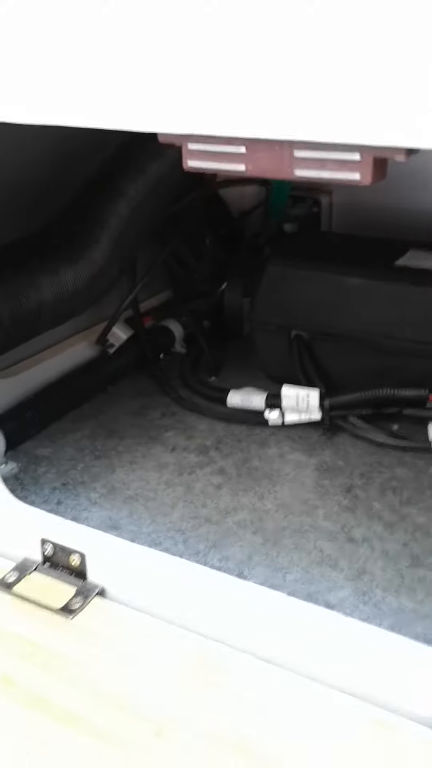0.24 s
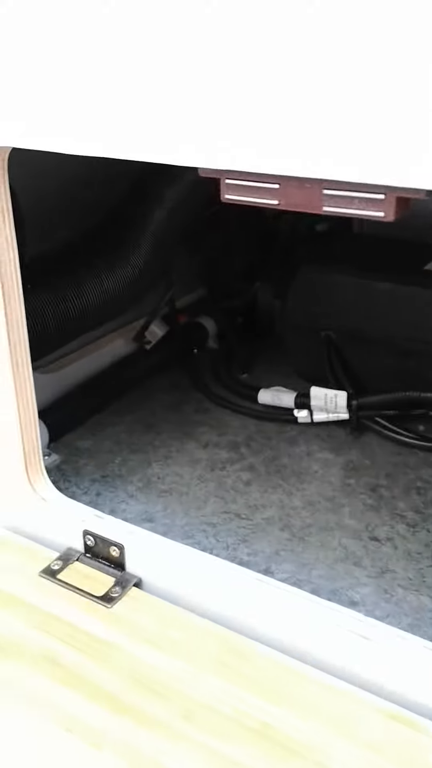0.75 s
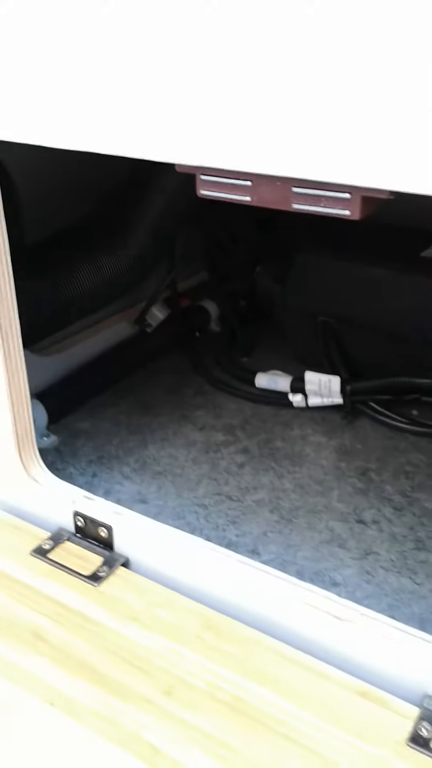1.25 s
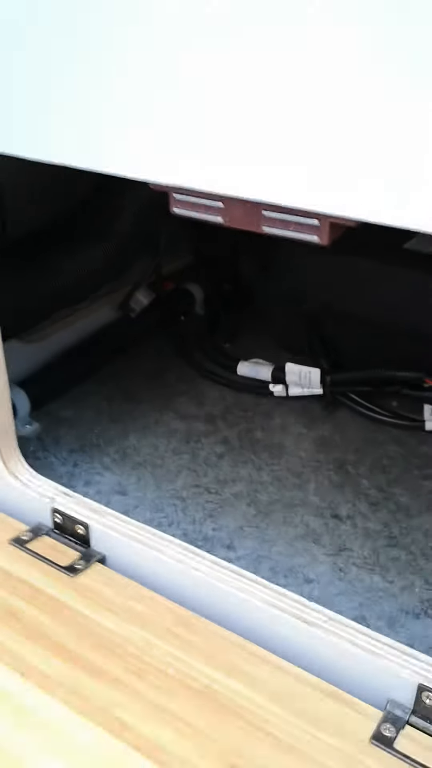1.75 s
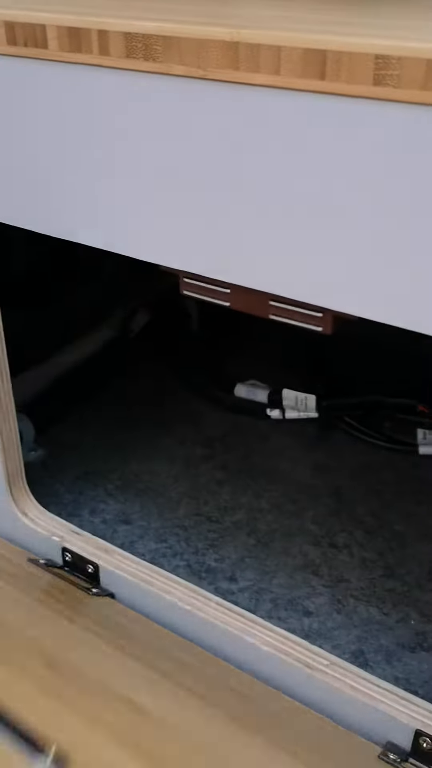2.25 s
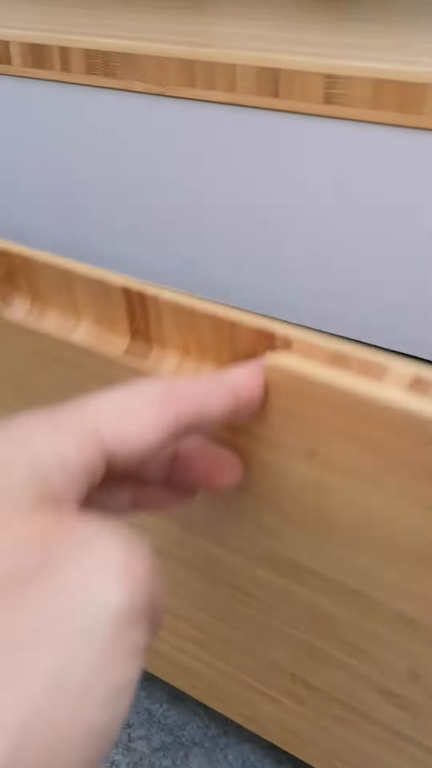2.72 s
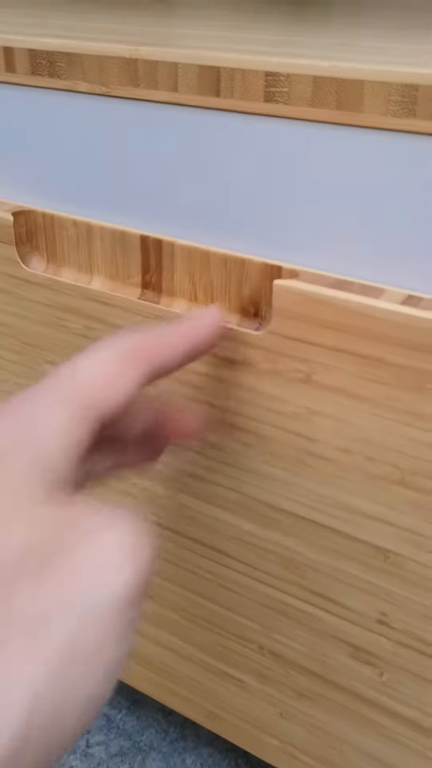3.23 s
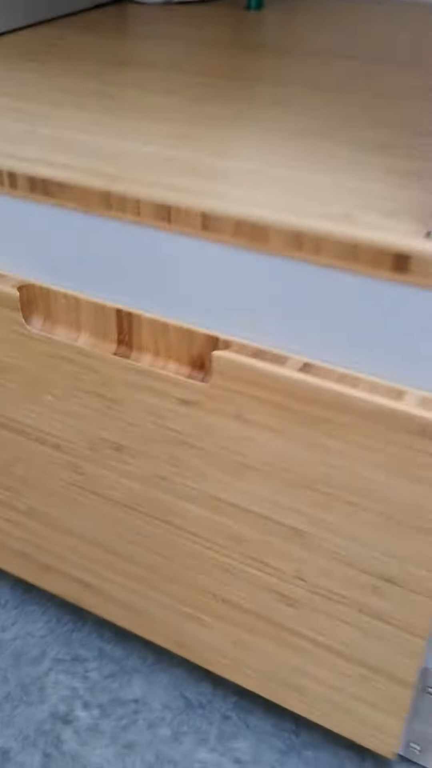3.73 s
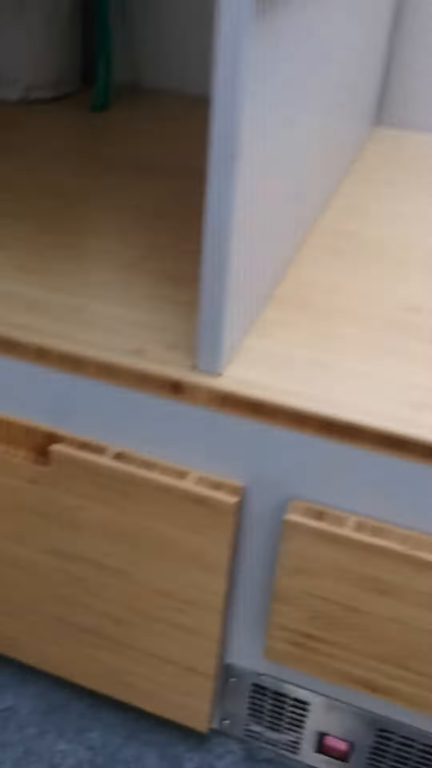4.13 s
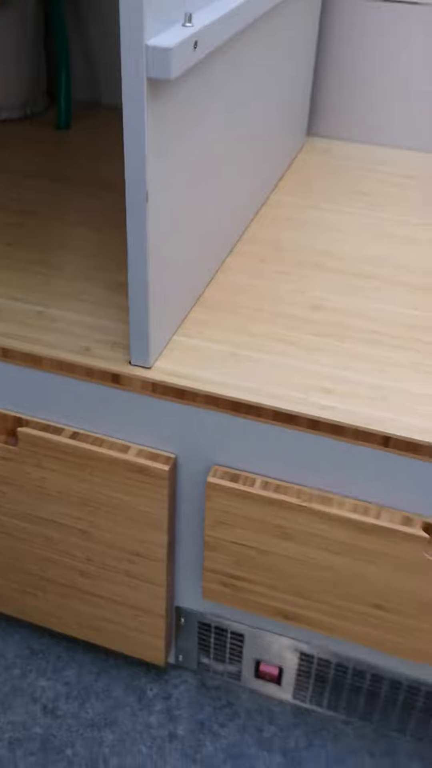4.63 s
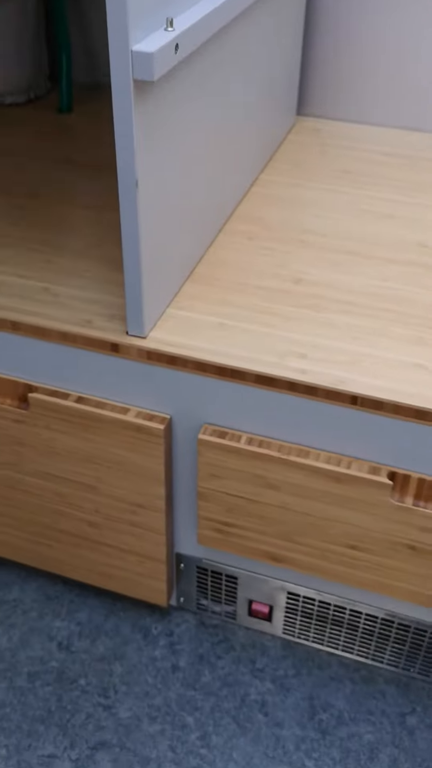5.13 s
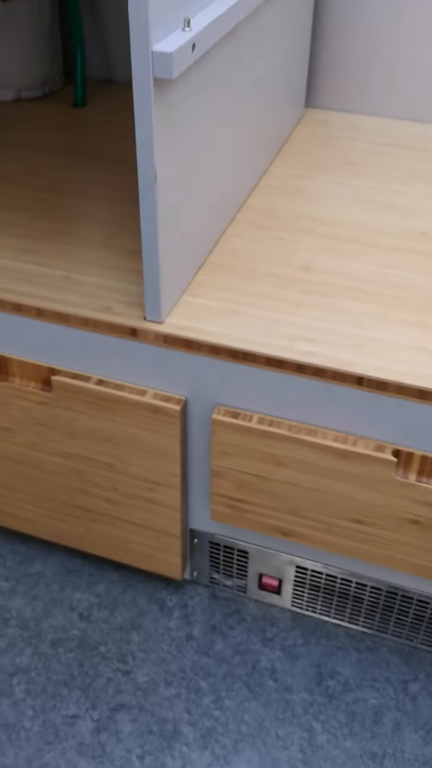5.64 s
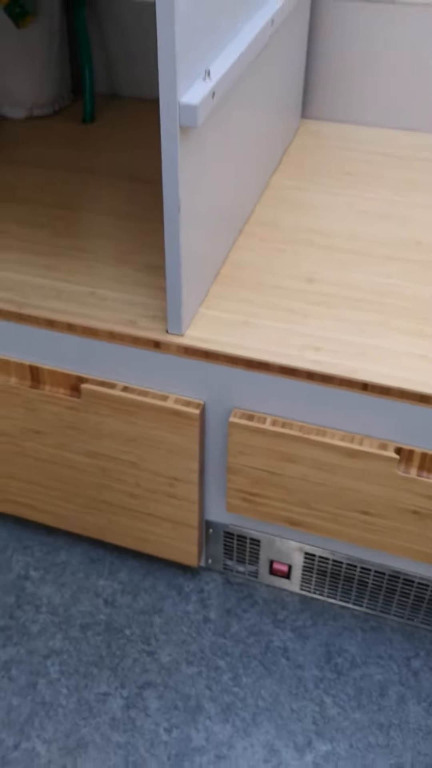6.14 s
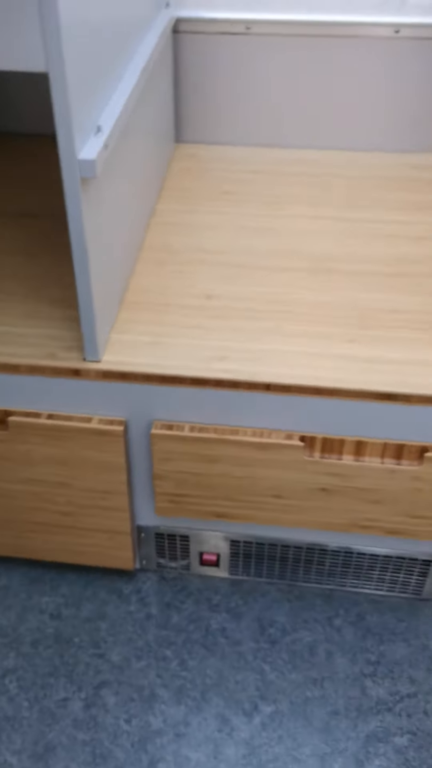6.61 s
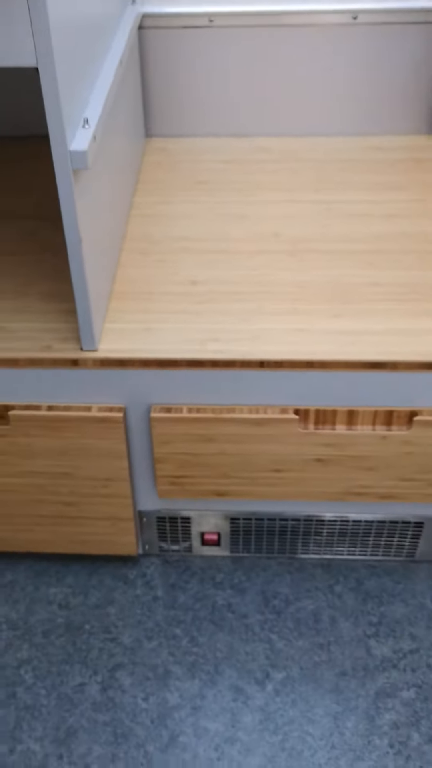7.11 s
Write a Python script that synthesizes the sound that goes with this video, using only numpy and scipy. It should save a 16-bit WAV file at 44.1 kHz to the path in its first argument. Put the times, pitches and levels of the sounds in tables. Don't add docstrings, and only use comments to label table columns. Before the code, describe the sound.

A hand-held camera's stereo microphones hear a small blower heater running throughout, lumpy low rumble under breathy duct noise and a steady hum. Fabric slides and small plastic creaks accompany an arm reaching. A thin hinge note precedes one loud, woody magnetic slam. Afterwards the heater is quieter and muffled, with brisk cloth scrapes and two heavy, dull knocks on a hollow floor in the dry, small interior.

```python
import sys
import numpy as np
from scipy import signal
from scipy.fft import rfft, irfft, next_fast_len
from scipy.io import wavfile
from scipy.ndimage import uniform_filter1d, map_coordinates

SR = 44100
rng = np.random.default_rng(int(sys.argv[2]) if len(sys.argv) > 2 else 0)


def rack_gain(trim_db):
    fader = np.asarray(trim_db, float)
    return 10 ** (fader / 20)


def transcribe(signal):
    frames = np.atleast_2d(signal).T
    limited = np.clip(frames, -1, 1)
    pcm = np.round(limited * 32767).astype(np.int16)
    wavfile.write(sys.argv[1], SR, pcm)


N = 325017

LEFT_LAG_S = 24 / 44100
TOP_HZ = 15350
SHUT_S = 3.1
SETTLED_S, SETTLE_T60_S = 3.265, 0.09
SHADE_S, SHADE_LENGTH_S, SHADE_DB = 2.65, 0.23, -7.5
SIDEBANDS_DB, SIDEBANDS_SHUT_DB = -5, -7
STROKE_DROP_DB, STROKE_SHAPE = 22.5, 1.27
FIDGET_DB, FIDGET_SCRAPE_DB = -81.5, 7
CRUNCH_T60_S = 0.031

# time_s, gain_db
NEARNESS = [(0.0, 0), (0.9, -2.5), (1.15, 2.5), (1.75, 2.5), (1.97, -0.5), (2.25, -3.5), (2.5, -1.5),
            (2.95, -3), (3.45, -3.5), (4.3, -7.5), (5.5, -9.5), (6.3, -9), (7.37, -7.5)]
# level_db, slope (dB per dB of nearness), change_when_shut_db
DEEP_LAW = (-52, 0.7, -1.2)
BOOM_LAW = (-47, 1.2, -3)
DUCT_LAW = (-56.5, 0.75, 0.32)
GRILLE_LAW = (-65, 1, 1)
BLADE_LAW = (-53, .6, -6)
WHINE_LAW = (-74.5, 1.2, -2.5)
# pitch_hz, likeness (1 same, -1 opposite)
HEATER_LIKENESS = [(60, 0.99), (130, 1), (290, 0.68), (640, -0.18), (1410, 0.49), (3100, -0.33),
                   (6820, 0.0), (15000, -0.11)]

# pitch_hz, level_db (per Hz)
DEEP_SPECTRUM = [(12, -46), (24, -17.5), (38, -2), (65, -0.5), (130, -10), (170, -29.5), (290, -120)]
BOOM_SPECTRUM = [(47, -33), (80, 0.5), (148, 1.5), (205, -7.5), (242, -18), (290, -15.5), (320, -20.5),
                 (420, -42.5), (700, -120)]
# middle_s, length_s, deep_db, boom_db
GRIP_JOLTS = [(0.159, 0.037, -63, -38.5), (0.322, 0.017, -52, -37.5), (0.633, 0.31, -64, -42.5),
              (1.118, 0.11, -33.5, -37), (1.226, .08, -45, -33), (1.324, 0.1, -41, -42),
              (1.424, 0.075, -36, -35.5), (1.585, 0.093, -37, -31.5), (1.862, 0.15, -39, -42),
              (2.102, 0.039, -64, -47), (2.314, 0.096, -43, -44.5), (2.425, 0.086, -41.5, -46),
              (2.613, 0.057, -44, -42), (2.878, 0.084, -49, -47), (3.234, 0.078, -47, -44),
              (3.544, 0.09, -48.5, -47.5), (3.807, 0.046, -49, -63), (4.06, 0.16, -46, -59),
              (4.668, 0.045, -49, -61.5), (4.948, 0.099, -48.5, -56), (5.3, .1, -52.5, -60),
              (5.55, 0.21, -54.5, -60.5), (5.901, 0.22, -56, -60), (6.45, 0.1, -47, -60),
              (6.653, 0.042, -51, -51.5), (6.85, .07, -50, -62), (7.202, 0.079, -48, -50)]

# pitch_hz, level_db (per Hz)
DUCT_OPEN_SPECTRUM = [(120, -39), (200, -7), (258, -7), (323, -5.5), (349, -19), (376, -10), (493, -10.5),
                      (651, -17), (817, -14), (889, -25.5), (951, -21.5), (1210, -26), (1500, -23.5),
                      (1950, -51), (3300, -120)]
DUCT_SHUT_SPECTRUM = [(120, -29.5), (200, 1.5), (332, -3.5), (383, -11), (427, -12), (758, -17.5),
                      (831, -13.5), (1060, -26.5), (1500, -25.5), (1950, -52), (3300, -120)]
GRILLE_SPECTRUM = [(650, -37.5), (1100, -2.5), (1200, -4), (1430, -10), (1590, 1), (1920, 5.5), (2310, -7),
                   (2700, 2.5), (3220, -28.5), (3630, -16.5), (4000, -26), (5200, -50.5), (8800, -120)]
# pitch_hz, level_db, width_hz
HUMS_OPEN = [(464, -71, 11), (574, -83, 6.1), (833, -75.5, 12), (953, -80, 10), (1410, -80.5, 22),
             (1885, -74.5, 12)]
HUMS_SHUT = [(423.6, -72, 11), (527, -85.5, 11), (582, -80, 10), (1850, -86, 20)]
# time_s, pitch_hz, standing_wave_db
BLADE_SPEED = [(0.0, 324, 0.5), (1.8, 326.8, -0.5), (3.0, 326.5, -0.5), (3.58, 327.3, 0),
               (3.68, 327.5, -6.5), (3.97, 328, -7), (4.05, 328, 4), (4.3, 328.5, -1), (4.95, 332.5, 3),
               (5.4, 335, 0), (6.3, 337.3, -1), (7.2, 337.5, -0.5), (7.37, 334.5, 1)]
# pitch_hz, level_db
SWITCHING_LINES = [(9512, -97.5), (9555, -83), (9674, -83), (9717, -87.5), (9841, -78), (10002, -85),
                   (10040, -87), (10164, -90.5), (10287, -89.5), (10331, -89.5), (10450, -94.5),
                   (10494, -93)]

# pitch_hz, level_db (per Hz)
FABRIC_SPECTRUM = [(1650, -28), (2800, -0.5), (3030, -9), (3450, -7.5), (3740, -5.5), (5800, -6),
                   (6330, -10), (7740, -6), (8380, -8), (10900, -14), (14600, -19.5), (15400, -23.5),
                   (15700, -41.5)]
SCRAPE_SPECTRUM = [(410, -49), (700, -15.5), (730, -9.5), (963, -6.5), (1050, -5), (1270, -8), (1830, -2.5),
                   (2190, -3.5), (3440, -12), (3800, -17.5), (4940, -39), (8360, -120)]
# peak_s, rise_s, fall_s, level_db, scrape_db (over the level)
SLEEVE_STROKES = [(0.6, 0.13, .15, -77.5, 11), (0.98, 0.19, 0.74, -65, 5), (1.16, 0.35, 0.12, -62.5, 2),
                  (1.47, 0.26, 0.57, -67.5, 7.5), (1.64, 0.21, 0.21, -62.5, 6), (1.76, 0.049, 0.13, -62, 9),
                  (1.835, .02, 0.42, -65, 4.5), (2.42, 0.38, 0.2, -66, 8), (2.585, .06, 0.096, -67.5, 9),
                  (3.2, .1, .3, -64.5, -24.5), (3.37, 0.25, 0.56, -58.5, -1), (3.57, 0.42, 0.16, -61, 2),
                  (3.8, 0.17, 0.44, -67, 9.5)]
# peak_s, rise_s, fall_s, level_db, scrape_db (over the level)
LEG_STROKES = [(3.963, 0.017, 0.22, -49.5, -3), (4.07, 0.16, 0.15, -50, 2), (4.14, 0.17, 0.035, -57, 2.5),
               (4.5, 0.98, 0.74, -69, 3), (4.885, 0.041, 0.17, -63, 7), (4.955, 0.11, 0.086, -49.5, 4.5),
               (5.045, .1, 0.027, -58.5, -9), (5.125, 0.028, 0.1, -67.5, 12), (5.57, 0.18, 0.18, -65, 1.5),
               (5.8, 0.097, 0.22, -58, -1), (5.895, 0.22, 0.08, -62, 7.5), (6.1, 0.12, 0.25, -70, 5),
               (6.335, 0.098, 0.18, -54, 2), (6.6, 0.37, 0.47, -67.5, 4.5), (6.89, 0.61, 0.3, -62, -4.5),
               (7.1, 0.083, 0.15, -62, 4.5), (7.19, 0.11, 0.12, -57, 5.5), (7.37, 0.22, .2, -61.5, 3.5)]
# time_s, left_right_db
BODY_SIDE = [(0.0, -25.5), (1.0, -5.5), (2.2, -9), (3.1, -3), (4.2, -2.5), (4.6, -6.5), (7.37, -7)]

# pitch_hz, level_db
CABIN_DECAY = [(100, 0.89), (500, .15), (2000, 0.12), (10000, 0.037)]
CABIN_COLOUR = [(100, -20), (600, 3), (2000, -5.5), (6000, 0.5), (12000, 1.5), (16000, -18)]

# start_s, level_db, pitch_hz, width_octaves, left_right_db
TAPS = [(0.991, -42, 1670, 1.2, 1), (1.150, -41, 1890, 0.68, -2), (1.166, -51, 2200, 1.2, -5),
        (1.568, -39, 1823, 1.25, -6), (1.046, -44, 1610, 1.3, -2.5), (1.833, -44, 8000, 1.6, -6),
        (2.432, -41.5, 1160, 1.2, 0), (3.077, -42, 1103, 1.1, -1), (3.954, -38.5, 7530, 0.57, 12),
        (3.955, -50, 4946, 0.1, -12.5), (5.1173, -43.5, 1743, .22, -4.5), (5.118, -46, 871, 0.76, -3.5),
        (5.124, -52, 6930, 1.5, -9), (6.258, -47.5, 882, 0.74, -2), (6.897, -39.5, 1793, 0.6, -5)]
# start_s, level_db, pitch_hz, width_octaves, left_right_db
MORE_TAPS = [(1.0206, -48, 1129, 1, -5), (1.0984, -50, 1680, 1, -4), (1.1293, -51, 1950, .7, -4.5),
             (1.1982, -52, 1930, 1.1, -5), (1.2341, -48, 1890, 1.1, -5), (1.3917, -51, 1950, 1, -1.5),
             (1.446, -46, 1300, 1.1, -7.5), (1.48, -45, 1490, 1.2, -3), (1.515, -47, 1600, 1, -6),
             (1.545, -54, 2800, 0.68, -5), (1.645, -51.5, 3500, 0.67, -5), (1.6816, -51.5, 1900, .8, -5),
             (1.765, -52, 2900, .7, -5), (2.385, -50, 1900, 1.2, -3), (2.438, -47, 1900, 1.1, -3),
             (5.118, -51.5, 2690, 0.48, -9), (5.129, -60.5, 2400, 1, -4), (5.143, -54, 1800, 0.87, -1),
             (5.121, -48, 1200, .9, -3.5), (5.128, -52, 901, .9, -3), (5.151, -55, 1100, 1.1, -3),
             (5.172, -56, 1400, .9, -3), (6.901, -50, 1100, .7, -4.5), (6.912, -49, 1700, 1.1, -5),
             (6.923, -52, 2060, 0.67, -5), (6.94, -55, 1800, 1.14, -5), (6.475, -55, 1200, .8, -3),
             (6.497, -55.5, 1150, .4, -3)]
# middle_s, length_s, level_db, pitch_hz, width_hz
HINGE_RUBS = [(3.087, 0.011, -53, 1900, 1500), (5.04, 0.042, -56.5, 2440, 1200),
              (6.325, 0.048, -52, 1550, 2400), (4.955, 0.062, -52, 3100, 2000),
              (4.06, 0.037, -53, 2500, 1300), (1.655, .05, -63.5, 4900, 350), (1.57, 0.064, -41.5, 185, 60),
              (1.44, .04, -45.5, 204, 60), (1.93, .08, -58.5, 473, 60), (3.078, .014, -56, 1000, 250),
              (3.5, .3, -60, 480, 150)]
# middle_s, length_s, level_db, pitch_hz, glide_hz_per_s
SQUEAKS = [
    (2.575, .12, -68.5, 2880, 100),
    (2.65, .14, -65.5, 1185, -100),
    (2.32, .14, -78, 3620, 0),
]

# start_s, level_db, hardness_db (per octave), tuning, push_direction
THUDS = [(2.578, -46, -14, 1.18, -0.96), (4.031, -37, -3.5, 0.68, -1.15), (5.121, -52, 14, 1.0, 0.9),
         (5.2, -45, 2.5, 1.0, .9), (6.297, -56, 15, 0.9, 0.64), (6.326, -55.5, 15.5, 0.89, 1.1),
         (6.365, -56, 13, .9, .9), (6.845, -44.5, -9.5, 0.61, -0.99)]
# pitch_hz, level_db, die_away_s (60 dB)
FLOOR_MODES = [(49.5, -4, 0.41), (76.94, 1, 0.24), (104.5, -3, 0.28), (141, -1.5, 0.088),
               (182.4, 1.5, 0.069), (261, -23, 0.25), (387.6, -31, 0.2)]
# pitch_hz, level_db, die_away_s (60 dB)
BOARD_MODES = [(36.7, -26.0, 0.181), (52.8, -14.2, 0.18), (70.1, -4.5, 0.278), (102.2, 11.4, 0.075),
               (167.5, -9.4, 0.135), (184.6, -9.0, 0.115), (200.0, -34.0, 0.27), (355.0, -32.1, 0.036)]
# start_s, level_db, hardness_db (per octave), push_direction
KNEE_BLOWS = [
    (5.1163, -31.1, 14.0, -1),
    (5.1165, -23.5, -11.0, 1),
    (5.1321, -30.8, -0.8, 1),
    (5.1688, -29.0, -10.9, 1),
]
# pitch_hz, level_db, die_away_s (60 dB)
JOIST_MODES = [(35.5, -4.8, 0.092), (52.4, -3.9, 0.63), (74.0, 9.4, 0.088), (96.6, 3.4, 0.097),
               (127.8, -1.4, 0.091), (160.8, 9.9, 0.046), (239.8, -23.5, 0.132), (399.9, -35.0, 0.036)]
# start_s, level_db, hardness_db (per octave), push_direction
FOOT_BLOWS = [
    (6.2924, -49.5, 22.0, 1),
    (6.3135, -23.4, 0.2, 1),
    (6.3228, -35.7, 6.5, 1),
    (6.353, -33.4, 1.7, -1),
    (6.4202, -43.2, -18.0, 1),
    (6.453, -47.2, -13.8, 1),
]

# start_s, snap_db, frame_db
SLAM = [
    (3.0986, -4, -8),
    (3.1126, -24.5, 0),
]
# pitch_hz, level_db (per Hz)
CATCH_SPECTRUM = [(450, -45), (800, -18), (1250, -12.5), (2000, -6), (2900, -5.5), (3700, -5), (5300, -5),
                  (6300, -6), (8000, -3.5), (11100, -13.5), (14000, -35.5), (16300, -56)]
# pitch_hz, level_db, die_away_s (60 dB), left_right_db
PLATE_MODES = [(1007, -17, .04, -5), (1220, -10.5, 0.036, -6.5), (1400, -8.5, 0.054, -5),
               (1660, -11, .03, 3.5), (1835, -7.5, 0.031, -8.5), (2003, -9, 0.039, 5),
               (2200, -16.5, 0.044, -5), (2580, -14.5, 0.044, -6), (2900, -14, 0.035, -5),
               (3210, -17, 0.035, -7), (3854, -15.5, .03, 2), (4250, -17, .03, -7.5), (5130, -16, .045, -8),
               (5385, -14, 0.039, -9)]
# pitch_hz, level_db (per Hz)
RATTLE_SPECTRUM = [(240, -35.5), (400, -7), (720, -6), (930, -8.5), (1850, -6), (3230, -13), (7600, -12),
                   (11100, -21), (13000, -35.5), (15000, -68.5)]
# pitch_hz, level_db, die_away_s (60 dB)
FRAME_MODES = [(160.3, -32.5, 0.38), (242, -33, 0.24), (348, -28, 0.078), (490, -36, 0.073),
               (525, -36, .09), (810, -34.5, 0.054), (945, -38.5, .12)]
# pitch_hz, level_db, die_away_s (60 dB)
PANEL_MODES = [(44.9, -22, 1.4), (63, -4.2, .37), (78, 5.2, .084), (94.7, 3, .075), (131.3, 10, .045),
               (155.3, -14, .136), (164, -30, .22), (219, -33, .1), (262, -26.5, .07), (342.5, -37, .1),
               (500, -39.5, .06), (805, -47, .045), (905, -54, .04)]
# start_s, level_db, hardness_db (per octave), push_direction
PANEL_BLOWS = [
    (3.0998, -13.3, 12, 1),
    (3.1134, -16.7, 4.2, 1),
    (3.1289, -19, -12, -1),
    (3.2113, -33.7, -18, -1),
]

# pitch_hz, level_db (per Hz)
HISS_SPECTRUM = [(290, -36.5), (500, 8), (586, -12.5), (648, -3), (840, -10.5), (1070, -12), (1910, -8),
                 (4290, -13), (9900, -19), (14600, -29.5), (15700, -32)]


def unit(x):
    return x / np.sqrt(np.mean(x ** 2) + 1e-20)


def along(points, hz):
    f, v = np.transpose(points)
    return np.interp(np.log(hz + 1), np.log(f + 1), v)


def curves(rows):
    s, *cols = np.transpose(rows)
    return [np.interp(np.arange(N) / SR, s, c) for c in cols]


def wobble(rate):
    return map_coordinates(rng.standard_normal(int(N * rate / SR) + 4), [np.arange(N) * rate / SR])


def filtered(x, response):
    m = next_fast_len(x.shape[-1] + 8192)
    return irfft(rfft(x, m) * response(np.fft.rfftfreq(m, 1 / SR)), m)[..., :x.shape[-1]]


def rush(spectrum, alike, patchy_db):
    z = signal.stft(rng.standard_normal((2, N + 512)), nperseg=512)[2]
    field = uniform_filter1d(rng.standard_normal(z.shape[1:]), size=5, axis=0)
    field = uniform_filter1d(field, size=8, axis=1)
    pair = signal.istft(z * rack_gain(patchy_db * unit(field)), nperseg=512)[1][:, :N]

    def mid_side(hz):
        turn = np.arccos(np.clip(along(alike, hz), -1, 1)) / 2
        return rack_gain(along(spectrum, hz)) * (hz < TOP_HZ) * [np.cos(turn), np.sin(turn)]

    mid, side = filtered(pair, mid_side)
    return unit(np.array([mid + side, mid - side]))


def narrow(lines):
    def peaks(hz):
        return sum(rack_gain(db) * np.sqrt(SR / w) / (1 + ((hz - c) / w * 2) ** 2) for c, db, w in lines)

    noise = rng.standard_normal(N) + 0.55 * rng.standard_normal((2, N))
    return 0.66 * filtered(noise, peaks)


def burst(spectrum, t, apart):
    noise = rng.standard_normal(len(t)) + apart * rng.standard_normal((2, len(t)))
    return unit(filtered(noise, lambda hz: rack_gain(along(spectrum, hz))))


def dense(blow, spectrum):
    m = next_fast_len(blow.shape[-1] + 8192)
    lumps = np.sqrt(uniform_filter1d(np.abs(rfft(blow, m)) ** 2, size=300, axis=1) + 1e-12)
    even = filtered(blow, lambda hz: rack_gain(along(spectrum, hz)) / lumps)
    return even * np.linalg.norm(blow, axis=1, keepdims=True) / np.linalg.norm(even, axis=1, keepdims=True)


def spaced(pair):
    ears = np.array([[-1], [1]])
    return filtered(pair, lambda hz: np.exp(1j * np.pi * hz * LEFT_LAG_S * ears * (hz > 500)))


def wide(x, db):
    side = filtered(x, lambda hz: 1j * (hz / 400) ** 2 / (1 + (hz / 400) ** 2))
    return x + rack_gain(db) * side * [[1], [-1]]


def cabin(x, wet_db):
    hz, t, z = signal.stft(rng.standard_normal((2, SR // 2)), SR, nperseg=256)
    level_db = along(CABIN_COLOUR, hz)[:, None] - 60 * t / along(CABIN_DECAY, hz)[:, None]
    tail = signal.istft(z * rack_gain(level_db), SR, nperseg=256)[1]
    return rack_gain(wet_db) * signal.fftconvolve(x, tail / np.linalg.norm(tail[0]), axes=1)[:, :N]


def ring(modes, t, attack):
    tones = sum(rack_gain(db - 60 * t / t60) * np.sin(2 * np.pi * hz * t) for hz, db, t60 in modes)
    return (1 - np.exp(-t / attack)) * tones


def harder(modes, hard_db):
    return [(hz, level + hard_db * np.log2(hz / 76), t60) for hz, level, t60 in modes]


def add(track, s, sound):
    track[..., round(s * SR):round(s * SR) + sound.shape[-1]] += sound


def blows(modes, rows, attack):
    out, t = np.zeros(N + SR), np.arange(SR // 2) / SR
    for s, db, hard_db, way in rows:
        add(out, s, way * rack_gain(db) * ring(harder(modes, hard_db), t, attack))
    return out[:N]


def follow(law):
    level_db, slope, shut_db = law
    shut = np.clip((np.arange(N) / SR - SHUT_S) / 0.17 + 1, 0, 1)
    return level_db + slope * curves(NEARNESS)[0] + shut_db * shut


def rumble():
    s, length, deep_db, boom_db = np.transpose(GRIP_JOLTS)
    steps = np.arange(0, N, 32)
    shape = np.exp(-5.5 * ((steps[:, None] / SR - s) / length) ** 2)

    def power(law, jolt_db):
        return rack_gain(2 * follow(law)) + np.interp(np.arange(N), steps, shape @ rack_gain(2 * jolt_db))

    lumps = wobble(22)
    deep = unit(rack_gain(0.78 * lumps) * rush(DEEP_SPECTRUM, HEATER_LIKENESS, patchy_db=-0.4))
    boom = unit(rack_gain(2.5 * lumps) * rush(BOOM_SPECTRUM, HEATER_LIKENESS, patchy_db=3.0))
    return np.sqrt(power(DEEP_LAW, deep_db)) * deep + np.sqrt(power(BOOM_LAW, boom_db)) * boom


def blower():
    t = np.arange(N) / SR
    shut = np.clip((t - SHUT_S) / 0.5 + 1, 0, 1)
    shade_db = SHADE_DB * np.exp(-((t - SHADE_S) / SHADE_LENGTH_S) ** 2)

    opened = rush(DUCT_OPEN_SPECTRUM, HEATER_LIKENESS, patchy_db=3.0)
    opened = opened + rack_gain(59.5 + shade_db) * narrow(HUMS_OPEN)
    closed = rack_gain(0.8) * rush(DUCT_SHUT_SPECTRUM, HEATER_LIKENESS, patchy_db=2.4)
    closed = closed + rack_gain(63.5) * narrow(HUMS_SHUT)
    duct = rack_gain(follow(DUCT_LAW)) * (np.sqrt(1 - shut) * opened + np.sqrt(shut) * closed)
    grille = rack_gain(follow(GRILLE_LAW)) * rush(GRILLE_SPECTRUM, HEATER_LIKENESS, patchy_db=2.0)

    blade_hz, standing_db = curves(BLADE_SPEED)
    blade_level = rack_gain(follow(BLADE_LAW) + standing_db + 0.73 * wobble(6.6))
    blade_turns = np.cumsum(blade_hz + 1.0 * wobble(13)) / SR
    blade = blade_level * np.sin(2 * np.pi * blade_turns) * rack_gain([[0.3], [-0.3]])

    def line(hz, db):
        return rack_gain(db + 5 * wobble(1.6)) * np.sin(2 * np.pi * hz * t + 0.79 * wobble(25))

    def one_ear():
        sidebands = sum(line(hz, db) for hz, db in SWITCHING_LINES if abs(hz - 10002) > 20)
        return line(10002, 0.1) + rack_gain(SIDEBANDS_DB + 81.5 + SIDEBANDS_SHUT_DB * shut) * sidebands

    whine = np.array([one_ear(), one_ear()]) * rack_gain([[-1.5], [1.5]])
    return duct + grille + blade + rack_gain(follow(WHINE_LAW) + shade_db) * whine


def clothes():
    s, rise, fall, peak_db, scrape_db = np.transpose(SLEEVE_STROKES + LEG_STROKES)
    steps = np.arange(0, N, 32)
    late = steps[:, None] / SR - s
    shape = rack_gain(-2 * STROKE_DROP_DB * np.abs(late / np.where(late < 0, rise, fall)) ** STROKE_SHAPE)

    def strokes(db, rest_db):
        return np.sqrt(np.interp(np.arange(N), steps, shape @ rack_gain(2 * db)) + rack_gain(2 * rest_db))

    def slips(count, db):
        jumps = rack_gain(db * np.minimum(rng.exponential(size=N // count + 1), 3.1))
        return unit(uniform_filter1d(jumps.repeat(count)[:N], size=count))

    lumps = rack_gain(0.54 * wobble(40))
    fine = unit(0.8 + 0.25 * slips(count=50, db=6.0)) * rush(FABRIC_SPECTRUM, [(3000, 0.24)], patchy_db=1.5)
    fine = strokes(peak_db, FIDGET_DB) * fine
    coarse = unit(0.43 + 0.64 * slips(count=200, db=4.0)) * rush(SCRAPE_SPECTRUM, [(1000, 0.5)], patchy_db=2.5)
    coarse = strokes(peak_db + scrape_db - 3.5, FIDGET_DB + FIDGET_SCRAPE_DB) * coarse
    rustle = lumps * (fine + coarse)
    rustle = np.where(np.arange(N) < SHUT_S * SR, rustle, spaced(rustle))
    return rustle * rack_gain(np.outer([0.5, -0.5], curves(BODY_SIDE)[0]))


def ticks():
    out, t = np.zeros((2, N + SR)), np.arange(SR // 5) / SR
    for s, db, centre_hz, octaves, pan_db in TAPS + MORE_TAPS:
        band = lambda hz: 1 / (1 + (np.log2((hz + 1) / centre_hz) / octaves) ** 2 * 2.3) ** 2
        contact = filtered(1. * (np.arange(len(t)) == 40), band)
        crunch = unit(filtered(rng.standard_normal(len(t)), band))
        crunch = rack_gain(-60 * t / CRUNCH_T60_S) * (1 - np.exp(-t / 0.0006)) * crunch
        level = rack_gain(db + np.array([[pan_db / 2], [-pan_db / 2]]))
        add(out, s, level * (1.7 * contact / contact.max() + 0.22 * crunch))
    out = spaced(out[:, :N])
    return out + cabin(out, wet_db=-5.0)


def hinge():
    t = np.arange(N) / SR
    return sum(np.exp(-((t - s) / length) ** 2 * 4) * narrow([(hz, db, w)])
               for s, length, db, hz, w in HINGE_RUBS)


def squeaks():
    out, t = np.zeros(N), np.arange(N) / SR
    for s, length, db, hz, glide in SQUEAKS:
        swell = rack_gain(db + 3.0 * wobble(35.3)) * np.exp(-((t - s) / length * 2) ** 4)
        pitch_hz = hz + glide * (t - s) + 22 * wobble(44.7)
        out += swell * np.sin(2 * np.pi * np.cumsum(pitch_hz) / SR)
    return out * rack_gain([[-1.5], [1.5]])


def thuds():
    out, t = np.zeros(N + SR), np.arange(SR // 2) / SR
    for s, db, hard_db, tuning, way in THUDS:
        modes = [(hz * tuning, level, t60) for (hz, _, t60), (_, level, _)
                 in zip(FLOOR_MODES, harder(FLOOR_MODES, hard_db))]
        add(out, s, way * rack_gain(db) * ring(modes, t, attack=0.0028))
    knee = blows(BOARD_MODES, KNEE_BLOWS, attack=0.00326)
    foot = blows(JOIST_MODES, FOOT_BLOWS, attack=0.012)
    out = out[:N] + knee + foot
    return wide(out, db=5.5) + cabin(out[None], wet_db=-22.5)


def ringing_plate(t):
    out = np.zeros((2, len(t)))
    for hz, db, t60, pan_db in PLATE_MODES:
        pair = [ring([(hz * detune, db, t60)], t, attack=0.0012) for detune in rng.normal(1, 0.0089, size=2)]
        out += rack_gain([[pan_db / 2], [-pan_db / 2]]) * np.array(pair)
    return out


def flap():
    snap, panel, t = np.zeros((2, N + SR)), np.zeros(N + SR), np.arange(SR // 2) / SR
    for s, snap_db, frame_db in SLAM:
        fade = rack_gain(0 - 60 * t / 0.009) + rack_gain(-9 - 60 * t / 0.031)
        crack = fade * rack_gain([[-3], [1.5]]) * burst(CATCH_SPECTRUM, t, apart=1.6)
        rise = np.sin(np.pi / 2 * np.minimum(t / 0.00076, 1)) ** 2
        plate = ringing_plate(t)
        rattle = rack_gain(-22.0 - 60 * t / 0.27) / (1 + (t / 0.085) ** 4) * burst(RATTLE_SPECTRUM, t, apart=2.5)
        blow = rack_gain(-1.1) * dense(rise * crack, CATCH_SPECTRUM) + rack_gain(1.5) * spaced(plate) + rise * rattle
        add(snap, s, rack_gain(snap_db) * np.minimum(t / 0.0002, 1) * blow)
        add(panel, s + 0.0022, rack_gain(frame_db) * ring(FRAME_MODES, t, attack=0.0049))
    held_s = np.maximum(np.arange(N) / SR - SETTLED_S, 0)
    held = rack_gain(np.maximum(-60 * held_s / SETTLE_T60_S, -14))
    panel = held * (panel[:N] + blows(PANEL_MODES, PANEL_BLOWS, attack=0.0086))
    snap = filtered(snap[:, :N], lambda hz: 1 / (1 + (hz / 12500) ** 9))
    return snap + cabin(snap, wet_db=-20) + wide(panel, db=2.5)


def scene():
    return rumble() + blower() + clothes() + ticks() + hinge() + squeaks() + thuds() + flap()


def low_pass(x):
    return signal.sosfilt(signal.butter(12, 16450, fs=SR, output="sos"), x)


def record(dry):
    x = dry + rack_gain(-67.0) * rush(HISS_SPECTRUM, [(1000, 0.038)], patchy_db=0.5)
    x = x / (1 + np.abs(x / 0.88) ** 6) ** (1 / 6)
    x = filtered(x, lambda hz: (hz < 16400) / (1 + (hz / 15600) ** 30) * 1j * hz / (22 + 1j * hz))
    return low_pass(x)


dry = scene()
out = record(dry)
transcribe(out)
```